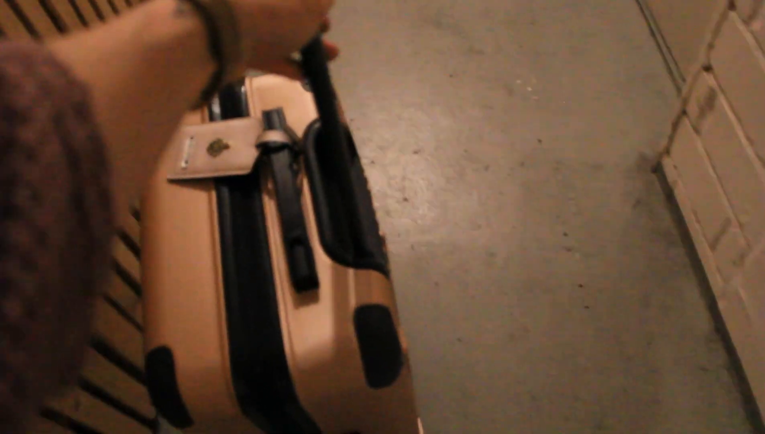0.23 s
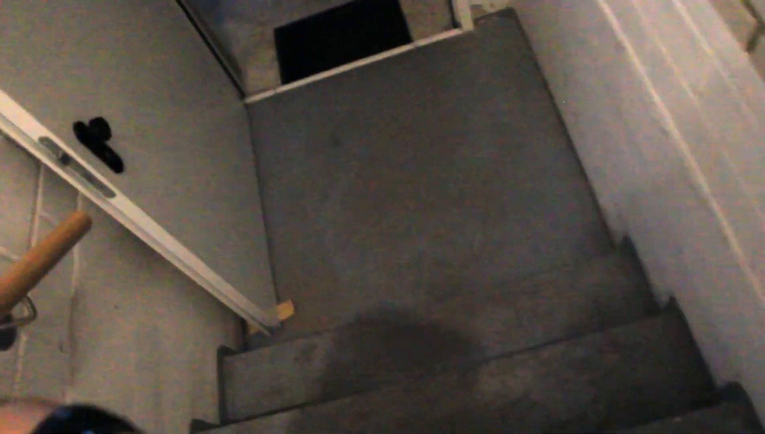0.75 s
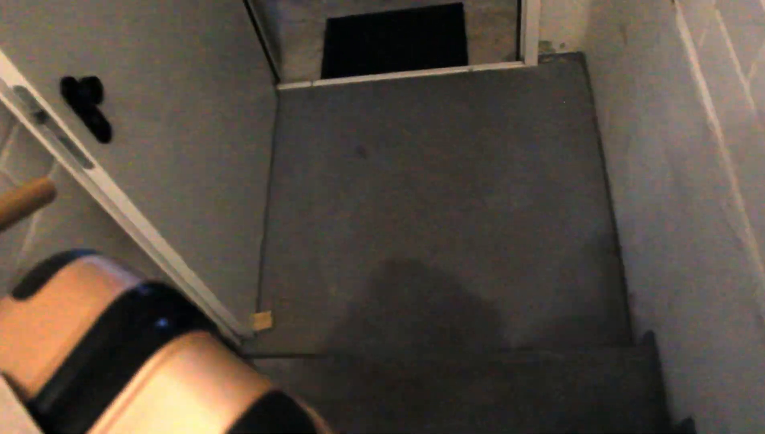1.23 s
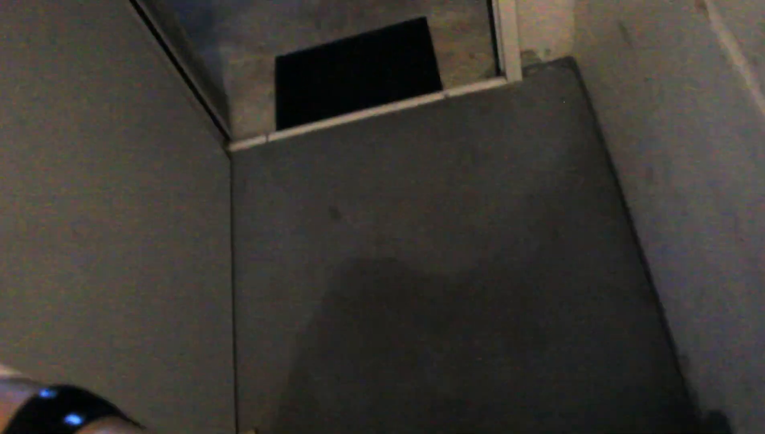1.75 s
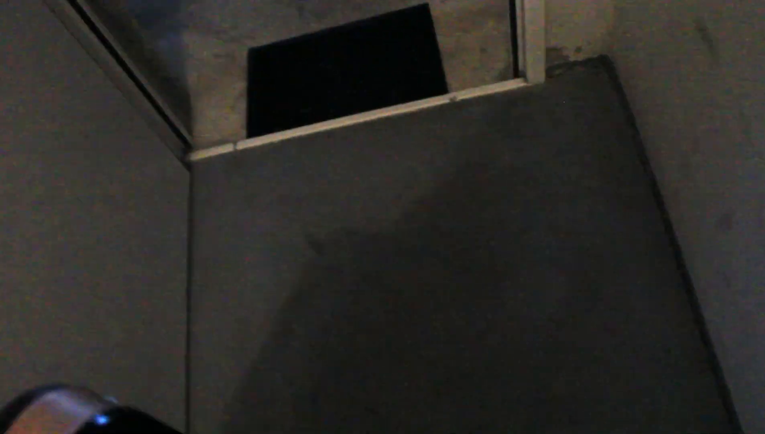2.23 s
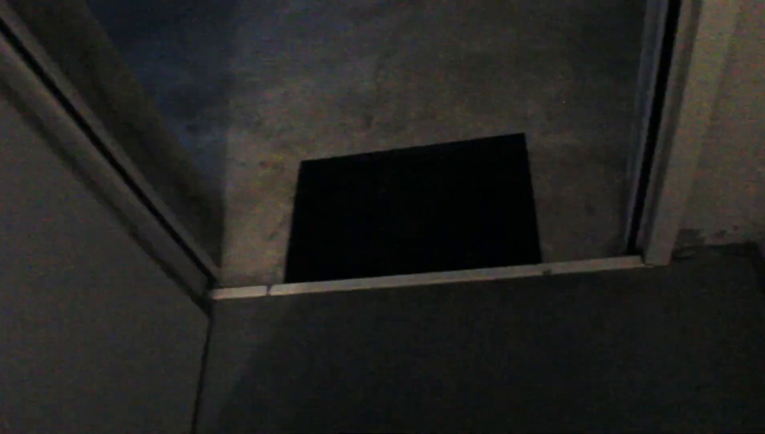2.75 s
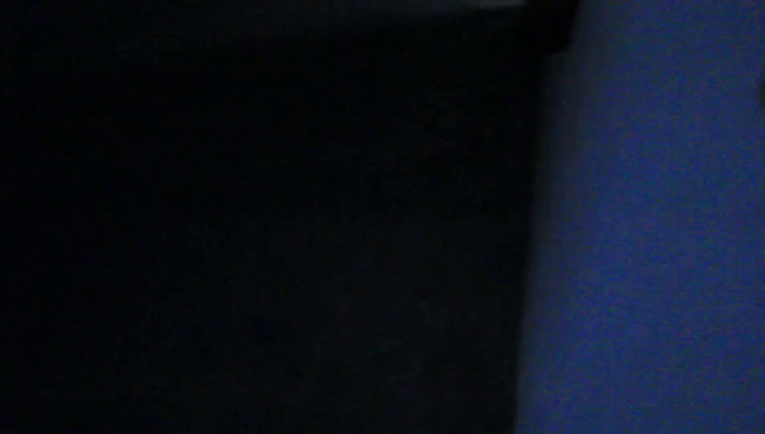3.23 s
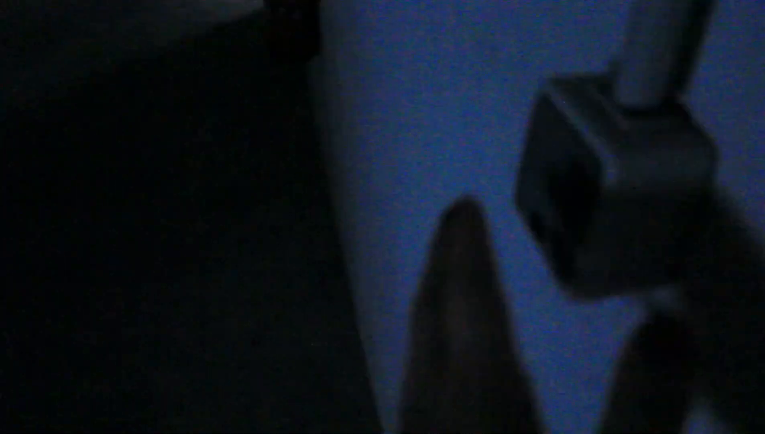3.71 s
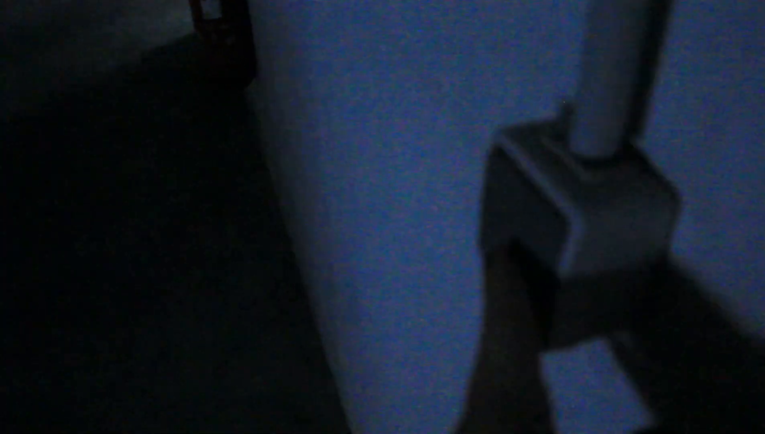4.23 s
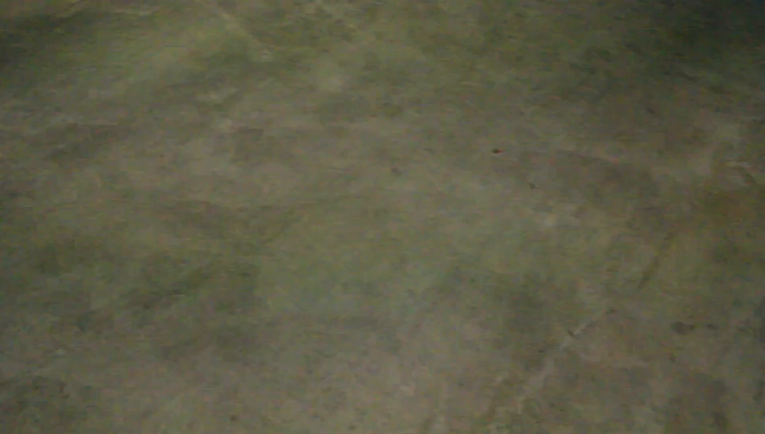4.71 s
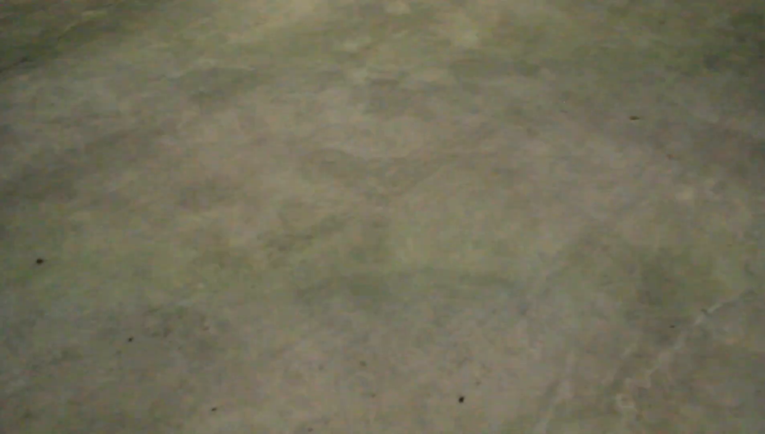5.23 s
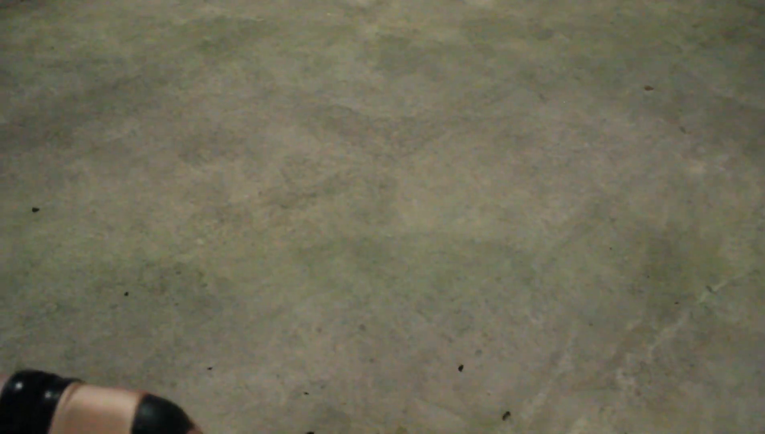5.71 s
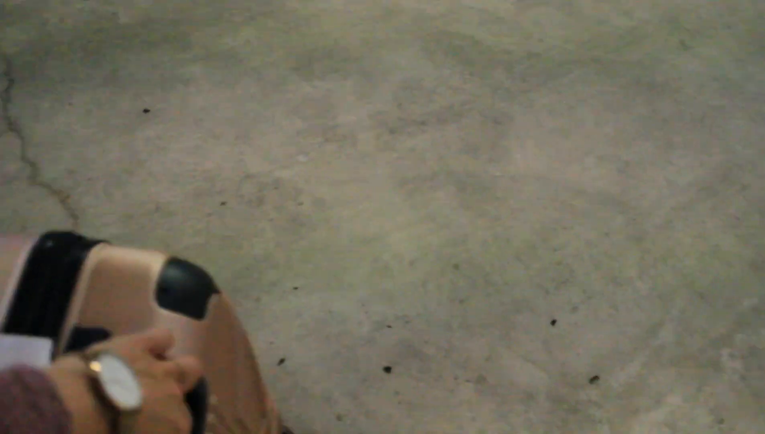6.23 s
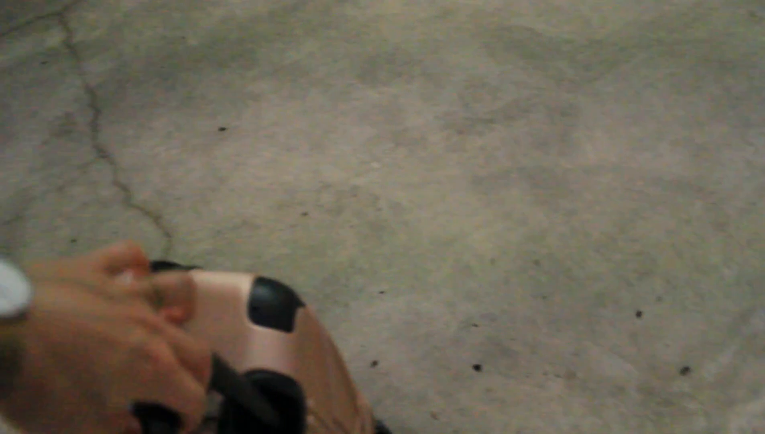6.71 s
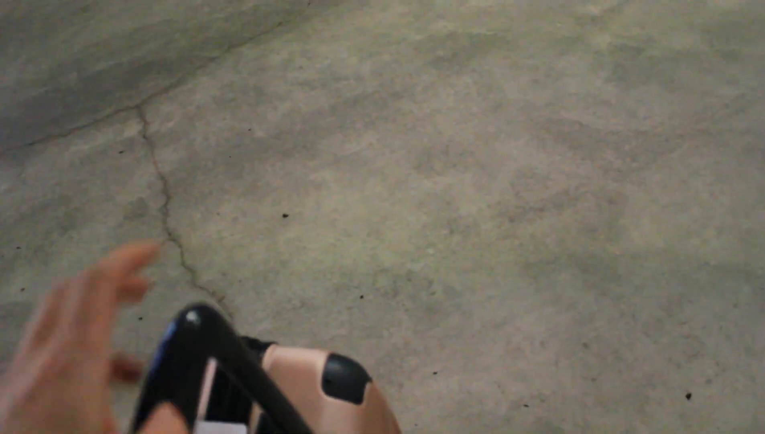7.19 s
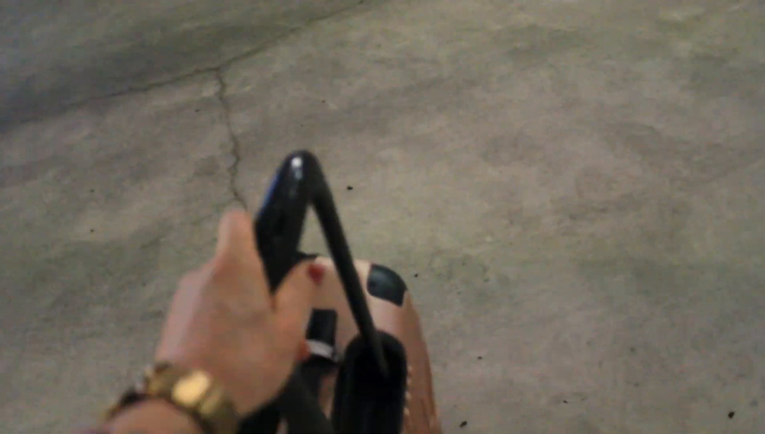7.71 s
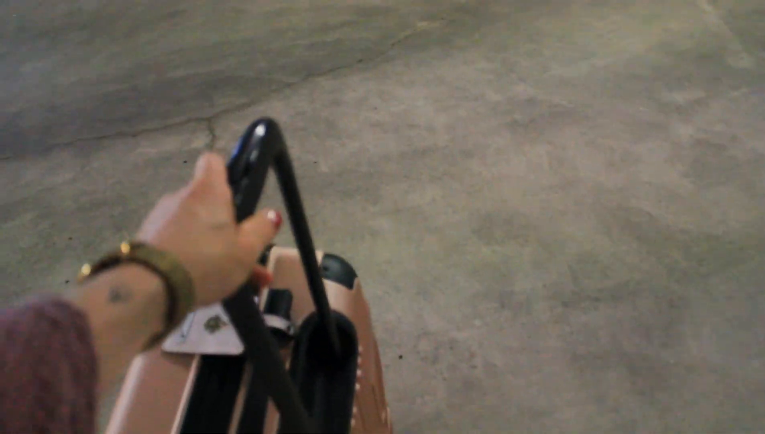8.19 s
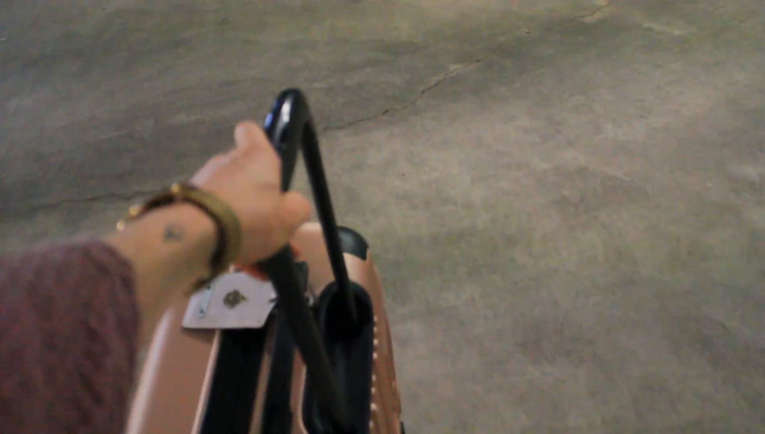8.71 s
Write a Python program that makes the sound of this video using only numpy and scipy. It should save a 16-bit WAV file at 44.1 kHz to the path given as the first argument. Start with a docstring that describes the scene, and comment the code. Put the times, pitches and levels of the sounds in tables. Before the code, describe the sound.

Close suitcase wheels rumble over a hard floor, drumming on the hollow shell, and stop abruptly at 0.4 seconds. From 0.7 to 2.8 seconds footsteps thud down concrete stairs, with grinding soles, ringing metal clinks, ticking zip pulls and the case rubbing against clothing. At about 3.3 seconds the case knocks loudly over a threshold, booming into an echoing garage with a faint low drone. A light switch snaps close by at 4 seconds and again at 4.3. From 4.7 to 6.1 seconds the case bumps and is set down with hollow thuds, strongest near 5.4. A catch clicks at 6.2, the telescopic handle hisses out from 6.5 and locks with a sharp clack at 6.9, followed by another knock and a tick. From 7.6 seconds the wheels roll softly over crackling grit, growing louder until about 9 seconds as loose fittings tick.

```python
"""Suitcase wheels rumble along a corridor, bumps drumming on the hard hollow shell, and stop abruptly.
On concrete stairs feet thud, soles grind and metal clinks as the carried case sways and its zip pulls
tick. It knocks over a threshold into an echoing, faintly droning garage. A light switch snaps, the case
is set down, its telescopic handle hisses out and locks, and the wheels roll off over crackling grit."""
import sys
import numpy as np
from scipy import signal
from scipy.fft import rfft, irfft
from scipy.io import wavfile
from scipy.ndimage import uniform_filter1d

SR = 44100
rng = np.random.default_rng(int(sys.argv[2]) if len(sys.argv) > 2 else 0)


def int16_out(signal):
    """Quantize to a 16-bit WAV file."""
    q = np.round(np.clip(np.atleast_2d(signal).T, -1, 1) * 32767)
    wavfile.write(sys.argv[1], SR, q.astype(np.int16))


N = 394686
TIME_S = np.arange(N) / SR
AGE_S = TIME_S[:SR]

# grit and cloth spectrum: freq_hz, level_db
RUSTLE_SPECTRUM = [(1300, 1), (2600, 4.5), (3800, -1), (15000, -21)]
# hard scrape and buzz spectrum: freq_hz, level_db
SCRAPE_SPECTRUM = [(700, -5.5), (1400, -7), (2000, 4.5), (3600, -3.5), (15000, -30.5)]


def wheels(path, rumble_trim_db, grit_trim_db, tilt_db_per_oct, cavity_trim_db, flicker_db):
    """Bumps in the concrete drum on the hollow shell; grit crackles under the wheels."""
    rumble_spectrum = [(40, -10), (115, -7), (165, -2.5), (310, 2.5), (760, -6.5), (2500, -25)]  # freq_hz, level_db
    cavity_modes = [(164.4, 17, 5), (231.6, 15, 0.5)]  # air and panel resonances: freq_hz, width_hz, level_db
    rumble_gain, grit_gain = gain_curves(path)
    drum = colour(grains(2500, 2.0), tilted(rumble_spectrum, tilt_db_per_oct))
    hollow = sum(from_db(db + cavity_trim_db) * resonate(drum, hz, hz / width_hz)
                 for hz, width_hz, db in cavity_modes)
    crackle = rms_one(colour(grains(3000, 3.2), RUSTLE_SPECTRUM)) * from_db(flicker_db * drift(64))
    rumble = rms_one((drum + hollow) * from_db(1.44 * drift(24)))
    return from_db(rumble_trim_db) * rumble_gain * rumble + from_db(grit_trim_db) * grit_gain * crackle


def wheel_squeak():
    """A wheel sticks and slips on its axle."""
    squeak = (.352, -34, .035, 2950)  # start_s, level_db, length_s, pitch_hz
    start_s, db, length_s, hz = squeak
    spectrum = [(hz * .75, -14), (hz, 0), (hz * 1.3, -14)]
    out = np.zeros(N)
    add(out, start_s, from_db(db) * chatter(length_s, .004, spectrum))
    return out


def knocks(thud_trim_db=-3.5, crack_trim_db=-1.5, reference_db=-17, shift_oct_per_db=-0.06):
    """Blows crack on the shell, ring it and shake its contents; harder ones lower and tilt its modes."""
    blows = [(0.2107, -16, -30), (3.2242, -15.5, -30), (3.2455, -7, -18.5), (3.254, -16, -15),
             (3.265, -8.5, -10.5), (3.2835, -6, -9.5), (3.499, -28, -35), (4.717, -23.5, -47),
             (4.738, -13.5, -26.5), (4.750, -22, -26), (4.833, -20.5, -46), (4.978, -27, -62),
             (5.4199, -8, -38), (5.629, -22, -39), (5.709, -20, -35), (6.129, -20.5, -38),
             (6.488, -26, -32), (6.558, -21.5, -23), (6.769, -16.5, -36), (6.928, -10, -24),
             (7.123, -14, -17)]  # start_s, thud_db, crack_db
    shell_modes = [(321, -16, 0.073), (456, -10.5, 0.027), (590, -3, 0.025), (1033, 2, 0.0049),
                   (1730, -4, 0.0061)]  # for a thud of reference_db: freq_hz, level_db, t60_s
    radiation = signal.butter(2, 280, "high", fs=SR, output="sos")  # small panels radiate little bass
    out = np.zeros(N)
    for start_s, thud_db, crack_db in blows:
        excess_db = thud_db - reference_db
        modes = [(hz * 2 ** (shift_oct_per_db * excess_db), db + 0.7 * excess_db * np.log2(hz / 800), t60_s)
                 for hz, db, t60_s in shell_modes]
        contents = colour(noise_burst(0.08), [(250, 1), (800, 12.8), (1800, 8.7)])
        thud = signal.sosfilt(radiation, ring(modes, spread_db=4) + from_db(-12) * contents)
        crack = snap(3030, t60_s=0.026, falloff_db=12, ripple_db=2.5)
        add(out, start_s, from_db(thud_db + thud_trim_db) * thud)
        add(out, start_s, from_db(crack_db + crack_trim_db) * crack)
    return out


def booms(attack_s=0.0038):
    """Jolts set the hollow case or one of its panels booming."""
    jolts = [(3.266, -22.5, 236, 0.27), (4.751, -23, 436, 0.064), (5.629, -19, 565, 0.031),
             (5.709, -22.5, 436, 0.056), (6.129, -24.5, 185, 0.13), (6.188, -26.5, 330, 0.097),
             (6.927, -15, 256, 0.076), (7.122, -29, 230, 0.23), (8.655, -23, 169, 0.17)]  # start_s, level_db, pitch_hz, t60_s
    out = np.zeros(N)
    for start_s, db, hz, t60_s in jolts:
        modes = [(hz, db, t60_s), (1.32 * hz, db + 1.5, t60_s / 2), (2.2 * hz, db - 6, t60_s / 2)]
        add(out, start_s, ring(modes, spread_db=1.5) * rise(attack_s) * from_db(2 * drift(72)[:SR]))
    return out


def footsteps(thud_trim_db=-7, note_trim_db=-1.5, heel_trim_db=-7, landing_s=0.0018):
    """Each foot lands with a thud, a heel tap and a hollow note that lingers in the stairwell."""
    steps = [(0.694, -27.5, -33, 217, -29), (1.299, -31, -27.5, 283, -36), (1.735, -25.5, -33, 205, -44),
             (2.153, -21.5, -16.5, 277, -32), (2.245, -31, -31, 304, -23.5), (2.693, -21, -19, 271.5, -24)]  # start_s, thud_db, note_db, note_hz, heel_db
    thud_spectrum = [(110, -5), (280, -1), (470, -7), (2200, -28)]  # freq_hz, level_db
    heel_spectrum = [(400, -3.5), (750, 0), (3000, -18.5)]  # freq_hz, level_db
    landing = rise(landing_s)
    out = np.zeros(N)
    for start_s, thud_db, note_db, hz, heel_db in steps:
        thud = with_energy(colour(landing * noise_burst(0.32), thud_spectrum), 0.031)
        note = landing * ring([(hz, 0, 0.13), (1.06 * hz, -14, 0.62)], spread_db=3)
        heel = with_energy(colour(landing * noise_burst(0.19), heel_spectrum), 0.037)
        add(out, start_s, from_db(thud_db + thud_trim_db) * thud)
        add(out, start_s, from_db(note_db + note_trim_db) * note)
        add(out, start_s, from_db(heel_db + heel_trim_db) * heel)
    return out


def clinks(trim_db=-5.5, tail_db=-5, tail_t60_s=0.53):
    """Metal clinks, each time brightest at another pitch; the narrow stairwell rings on."""
    strikes = [(0.9885, -19, 13000), (2.2059, -13, 5400), (2.4954, -13, 10500), (2.7526, -11.5, 13300)]  # start_s, level_db, brightest_hz
    clink_spectrum = [(1400, -7), (3100, -3.5), (6500, 1), (8000, -4), (10300, -0.5), (16000, -5)]  # freq_hz, level_db
    out = np.zeros(N)
    for start_s, db, hz in strikes:
        strike = noise_burst(0.039)
        strike = strike + from_db(9) * resonate(strike, hz, q=11)
        tail = from_db(tail_db) * noise_burst(tail_t60_s)
        clink = colour(strike + tail, clink_spectrum, ripple_db=4.2, ripple_bins=7)
        add(out, start_s, from_db(db + trim_db) * with_energy(metallic(clink, ring_db=-2.5), .0064))
    return out


def light_switch(pressed_hz=642, free_hz=672, let_go_s=4.2):
    """The spring snaps and the rocker buzzes; the hollow box rings higher once the finger lets go."""
    clicks = [(4.0168, -29.5, 3600, -34), (4.030, -19, 4560, -30), (4.0547, -9.5, 3500, -13.5),
              (4.2368, -37, 4770, -22), (4.246, -17, 7340, -30), (4.251, -15, 3350, -6.5)]  # start_s, snap_db, snap_hz, box_db
    buzzes = [(4.057, -21, 0.011), (4.252, -26, 0.0086)]  # start_s, level_db, length_s
    out = np.zeros(N)
    for start_s, snap_db, snap_hz, box_db in clicks:
        hz = pressed_hz if start_s < let_go_s else free_hz
        box = colour(ring([(hz, 0, 0.031), (hz, -32, 0.25)], spread_db=0), [(560, 0), (900, 0)])
        spring = snap(snap_hz, t60_s=0.0057, falloff_db=15, ripple_db=5)
        add(out, start_s, from_db(snap_db) * spring + from_db(box_db) * box)
    for start_s, db, length_s in buzzes:
        add(out, start_s, from_db(db) * chatter(length_s, 0.0046, SCRAPE_SPECTRUM, ripple_db=-1.5))
    return out


def handle_latch(release_s=0.004):
    """The catch chatters in the tubes on release and on locking."""
    bursts = [(6.18, -12.5, 0.0036, -0.5), (6.769, -16.5, 0.0048, 9), (6.791, -28, 0.025, -3),
              (6.9235, -10, 0.005, -0.1), (6.937, -19.5, 0.021, 1)]  # start_s, level_db, length_s, tilt_db_per_oct
    catch_spectrum = [(1350, -8.5), (1900, 3), (4600, 1.5), (16000, -5.5)]  # freq_hz, level_db
    out = np.zeros(N)
    for start_s, db, length_s, tilt_db_per_oct in bursts:
        spectrum = tilted(catch_spectrum, tilt_db_per_oct)
        add(out, start_s, from_db(db) * chatter(length_s, release_s, spectrum, ripple_db=3))
    return out


def handle_slide():
    """The telescopic tubes hiss as they are drawn out."""
    pull = [(6.46, -47), (6.56, -31), (6.66, -31.5), (6.78, -30.5), (6.91, -40.5)]  # time_s, level_db
    tube_spectrum = [(2000, -2.5), (12500, -2), (16000, -7)]  # freq_hz, level_db
    hiss = colour(grains(6000, 2.9), tube_spectrum, ripple_db=0.4) * from_db(1.7 * drift(110))
    return gain_curves(pull)[0] * rms_one(hiss)


def handle_rub(stage_q=5.5, swell_s=0.037):
    """The loose handle scrapes thinly against its tubes."""
    rubs = [(5.52, 0.16, -52, 2690), (6.383, 0.055, -48, 2140)]  # start_s, length_s, level_db, pitch_hz
    out = np.zeros(N)
    for start_s, length_s, db, hz in rubs:
        friction = resonate(resonate(rng.standard_normal(N), hz, stage_q), hz, stage_q)
        out += swells([(start_s, length_s, db)], swell_s, swell_s)[0] * rms_one(friction)
    return out


def fittings(tick_trim_db=-6, t60_s=0.03, size_range_db=10.5):
    """Zip pulls and loose fittings tick against the case and jiggle faintly at random."""
    ticks = [(0.284, -19.5, 4500), (0.844, -22, 3060), (1.0962, -18, 3070), (1.5902, -23, 3250),
             (1.634, -30.5, 5000), (2.0892, -20.5, 2860), (2.4052, -23, 5250), (3.077, -20, 2420),
             (4.8585, -29.5, 4470), (5.598, -24.5, 3560), (5.6565, -32, 7500), (6.261, -22.5, 2940),
             (7.3374, -10, 4400), (8.0249, -15, 2100), (8.369, -17, 4300), (8.6581, -19, 3520)]  # start_s, level_db, pitch_hz
    jiggles = [(4.899, 6.899, 9.5, -45.5), (6.9, 8.95, 29, -44.5)]  # start_s, end_s, ticks_per_s, lowest_db
    out = np.zeros(N)
    for start_s, db, hz in ticks:
        add(out, start_s, from_db(db + tick_trim_db) * snap(hz, t60_s, falloff_db=11, ripple_db=2))
    for start_s, end_s, per_s, db in jiggles:
        for slot_s in np.arange(start_s, end_s, 1 / per_s):
            lag, size, pitch_oct = rng.random(3)
            tick = snap(3200 * 2 ** pitch_oct, t60_s, falloff_db=14.5, ripple_db=4.5)
            add(out, min(slot_s + lag / per_s, TIME_S[-1]), from_db(db + size_range_db * size) * tick)
    return out


def scrapes(release_s=0.016):
    """Something hard drags briefly."""
    drags = [(3.501, -26, 0.018), (5.853, -37, 0.034), (6.42, -32.5, 0.0084), (7.508, -30.5, 0.0091)]  # start_s, level_db, length_s
    out = np.zeros(N)
    for start_s, db, length_s in drags:
        add(out, start_s, from_db(db) * chatter(length_s, release_s, SCRAPE_SPECTRUM))
    return out


def sole_slides(trim_db=7, attack_s=0.091, release_s=0.061):
    """Soles grind over gritty concrete and set thin metallic tones ringing."""
    slides = [(0.67, 0.062, -44.5, -7), (1.853, 0.045, -46.5, 4), (1.99, 0.068, -45.5, 4)]  # start_s, length_s, level_db, ring_db
    sole_spectrum = [(900, -0.5), (4200, -3), (7000, -8), (12000, -10), (16000, -15)]  # freq_hz, level_db
    out = np.zeros(N)
    for start_s, length_s, db, ring_db in slides:
        hiss = colour(grains(5000, 1.8), sole_spectrum, ripple_db=2, ripple_bins=7)
        gain, = swells([(start_s, length_s, db + trim_db)], attack_s, release_s)
        out += gain * rms_one(metallic(hiss, ring_db))
    return out


def carrying(rustle_trim_db=-3, rest_start_s=3.12, rest_end_s=5.5, attack_s=0.051, release_s=0.075):
    """The case sways against the leg and rubs on clothing; faint rubbing goes on except while it rests."""
    sways = [(0.80, 0.33, -43, -40), (1.37, 0.12, -49, -45.5), (1.76, 0.12, -41.5, -44),
             (2.04, 0.081, -37.5, -36.5), (2.24, 0.15, -36.5, -33.5), (3.03, 0.022, -34.5, -36),
             (5.14, 0.57, -50, -65), (6.48, 0.12, -34, -48), (6.80, 0.34, -42, -34),
             (7.27, 0.14, -44.5, -43)]  # start_s, length_s, shell_db, rustle_db
    shell_spectrum = [(70, -33.5), (150, -3.5), (320, -0.5), (700, -7), (2000, -21)]  # freq_hz, level_db
    shell_gain, rustle_gain = swells(sways, attack_s, release_s)
    moving, = swells([(0, rest_start_s, 0), (rest_end_s, TIME_S[-1], 0)], attack_s, release_s)
    shell_gain = np.hypot(shell_gain, from_db(-56) * moving)
    rustle_gain = np.hypot(rustle_gain, from_db(-52) * moving)
    shell = rms_one(colour(grains(3000, 3.6), shell_spectrum)) * from_db(1.7 * drift(22))
    rustle = rms_one(colour(grains(6100, 3.3), RUSTLE_SPECTRUM)) * from_db(4.7 * drift(56))
    return shell_gain * shell + from_db(rustle_trim_db) * rustle_gain * rustle


def garage_echo(x, wet_db=-14.5, build_up_s=0.0021):
    """Diffuse echo of bare concrete, dying sooner in the treble."""
    decay_times = [(200, 1.4), (2500, 0.78), (6000, 0.2), (14000, 0.22)]  # freq_hz, t60_s
    echo_spectrum = [(150, 0), (900, -8.5), (2500, -1), (6000, -3.5), (15000, -2)]  # freq_hz, level_db
    edges_hz = np.geomspace(80, 18000, 25)
    tail = np.zeros(SR)
    for low_hz, high_hz in zip(edges_hz, edges_hz[1:]):
        band = signal.butter(2, [low_hz, high_hz], "band", fs=SR, output="sos")
        tail += signal.sosfilt(band, noise_burst(at_hz(decay_times, np.sqrt(low_hz * high_hz))))
    tail = with_energy(colour(tail * rise(build_up_s), echo_spectrum), 1 / SR)
    return from_db(wet_db) * signal.fftconvolve(x, tail)[:N]


def room_air(level_db=-51):
    """A steady, dull hiss."""
    air_spectrum = [(40, -11.5), (80, -10.5), (130, -12.5), (800, -11.5), (3000, -21.5), (16000, -34)]  # freq_hz, level_db
    return from_db(level_db) * rms_one(colour(rng.standard_normal(N), air_spectrum))


def garage_drone(level_db=-63, full_at_s=2.1, fade_s=0.5):
    """The low drone of the garage comes in near its door."""
    drone_spectrum = [(35, -8), (75, 0), (120, -11)]  # freq_hz, level_db
    fade_in = np.clip((TIME_S - full_at_s) / fade_s + 1, 0, 1)
    return from_db(level_db) * fade_in * rms_one(colour(rng.standard_normal(N), drone_spectrum))


def metallic(x, ring_db, q=120):
    """A sound plus the metal partials it sets ringing in the stairwell."""
    partials = [(1930, 9.5), (2740, 10.5), (4190, 6), (5490, 5.5), (6400, 2), (9250, 1), (10100, -7),
                (11420, 4.5), (13100, 1.5), (15200, -3)]  # freq_hz, level_db
    return x + sum(from_db(db + ring_db) * resonate(x, hz, q) for hz, db in partials)


def snap(hz, t60_s, falloff_db, ripple_db, rattle_db=-1.5):
    """Hard plastic contact: one impulse and a short rattle, in a broad hump around hz."""
    hump = [(hz / 4, -2 * falloff_db), (hz / 2, -falloff_db / 2), (hz, 0),
            (hz * 2, -falloff_db), (hz * 8, -3 * falloff_db)]
    contact = from_db(rattle_db) * with_energy(noise_burst(t60_s), 1 / SR)
    contact[0] += 1
    return with_energy(colour(contact, hump, ripple_db), .002)


def chatter(length_s, release_s, spectrum, ripple_db=0, uneven_db=3.5, attack_s=0.0015):
    """Contacts too dense to tell apart build up, hold unevenly and die."""
    release = np.exp(-np.maximum(AGE_S - length_s, 0) / release_s)
    envelope = rise(attack_s) * release * from_db(uneven_db * drift(500)[:SR])
    contacts = colour(rng.standard_normal(SR) * envelope, spectrum, ripple_db)
    return with_energy(contacts, length_s + release_s / 2)


def ring(modes, spread_db):
    """Struck modes: decaying sines of randomly varied strength."""
    return sum(from_db(db + rng.normal(0, spread_db) - 60 * AGE_S / t60_s) * np.sin(2 * np.pi * hz * AGE_S)
               for hz, db, t60_s in modes)


def grains(per_s, spread_db):
    """Random tiny impacts of uneven size."""
    sizes = from_db(spread_db * np.minimum(rng.exponential(1, N), 4)) * rng.choice([-1, 1], N)
    return rms_one(sizes * (rng.random(N) < per_s / SR))


def noise_burst(t60_s):
    """One second of decaying noise."""
    return rng.standard_normal(SR) * from_db(-60 * AGE_S / t60_s)


def colour(x, spectrum, ripple_db=0, ripple_bins=41, taps=4096):
    """Minimum-phase filter, steep beyond the spectrum's ends; close reflections ripple it at random."""
    hz = np.maximum(np.arange(taps // 2 + 1) * SR / taps, 1)
    beyond_oct = np.abs(np.log2(hz / np.clip(hz, spectrum[0][0], spectrum[-1][0])))
    ripple = uniform_filter1d(rng.standard_normal(len(hz)), ripple_bins)
    ripple = rms_one(uniform_filter1d(ripple, ripple_bins))
    db = at_hz(spectrum, hz) - np.minimum(24 * beyond_oct, 60) + ripple_db * np.minimum(ripple, 1.5)
    cepstrum = irfft(np.log(from_db(db)))[:taps // 2]
    cepstrum[0] /= 2
    impulse_response = irfft(np.exp(rfft(2 * cepstrum, taps)))
    return signal.fftconvolve(x, impulse_response)[:len(x)]


def resonate(x, hz, q):
    """One resonance with unit peak gain."""
    return signal.lfilter(*signal.iirpeak(hz, q, SR), x)


def tilted(spectrum, db_per_oct):
    """The spectrum made brighter or darker."""
    return [(hz, db + db_per_oct * np.log2(hz / spectrum[0][0])) for hz, db in spectrum]


def at_hz(points, hz):
    """Interpolate a table over log frequency."""
    freq_hz, values = np.transpose(points)
    return np.interp(np.log(hz), np.log(freq_hz), values)


def gain_curves(rows, fade_s=.02):
    """One gain curve per dB column, fading out beyond the first and last rows."""
    time_s, *columns_db = np.transpose(rows)
    gate = np.interp(TIME_S, [time_s[0] - fade_s, time_s[0], time_s[-1], time_s[-1] + fade_s], [0, 1, 1, 0])
    return [gate * from_db(np.interp(TIME_S, time_s, db)) for db in columns_db]


def swells(rows, attack_s, release_s):
    """One gain curve per dB column: each stroke swells, holds and dies away."""
    power = 0
    for start_s, length_s, *db in rows:
        before_s = np.maximum(start_s - TIME_S, 0)
        after_s = np.maximum(TIME_S - start_s - length_s, 0)
        shape = np.exp(-before_s / attack_s - after_s / release_s)
        power = power + np.outer(from_db(db), shape + 1e-9) ** 2
    return np.sqrt(power)


def rise(attack_s):
    """Exponential onset from 0 to 1."""
    return 1 - np.exp(-AGE_S / attack_s)


def drift(rate_hz):
    """Random wander between unit normal values."""
    return np.interp(TIME_S * rate_hz, np.arange(4000), rng.standard_normal(4000))


def from_db(db):
    """Decibels to gain."""
    return 10 ** (np.asarray(db) / 20)


def rms_one(x):
    """Scale to rms 1."""
    return x / np.sqrt(np.mean(x ** 2) + 1e-20)


def with_energy(x, length_s):
    """Scale to the energy of rms 1 held for length_s."""
    return x * np.sqrt(length_s * SR / np.sum(x ** 2))


def add(track, start_s, sound):
    """Mix a sound in at start_s."""
    start = max(round(start_s * SR), 0)
    track[start:start + len(sound)] += sound[:N - start]


def scene(corridor_end_s=.388, close_send_db=-7.5):
    """Corridor, stairs, garage. Switch and catch are close, so they are drier."""
    corridor_path = [(0.0, -31, -35.5), (0.09, -32.5, -43), (0.22, -27.5, -35), (0.385, -33, -37)]  # time_s, rumble_db, grit_db
    garage_path = [(7.6, -48, -41.5), (8.2, -50.5, -62), (8.26, -42.5, -37.5), (8.45, -40, -63),
                   (8.65, -37.5, -51.5), (8.95, -35, -52)]  # time_s, rumble_db, grit_db
    corridor = wheels(corridor_path, rumble_trim_db=-1, grit_trim_db=-2.5, tilt_db_per_oct=1.5,
                      cavity_trim_db=-4, flicker_db=4)
    corridor = (corridor + wheel_squeak()) * (TIME_S < corridor_end_s)
    roll_off = wheels(garage_path, rumble_trim_db=2, grit_trim_db=-8, tilt_db_per_oct=-0.5,
                      cavity_trim_db=1, flicker_db=8)
    contacts = knocks() + booms() + fittings() + handle_slide() + handle_rub() + scrapes()
    close = light_switch() + handle_latch()
    echo = garage_echo(contacts + from_db(close_send_db) * close)
    air = room_air()
    walking = carrying() + sole_slides() + footsteps() + clinks()
    return (corridor + roll_off + walking + contacts + close + echo + air + garage_drone())[None]


def record(dry, cutoff_hz=15850):
    """Clip at full scale, then low-pass steeply."""
    lowpass = signal.ellip(10, .1, 70, cutoff_hz, fs=SR, output="sos")
    return signal.sosfilt(lowpass, np.clip(dry, -1, 1))


dry = scene()
out = record(dry)
int16_out(out)
```